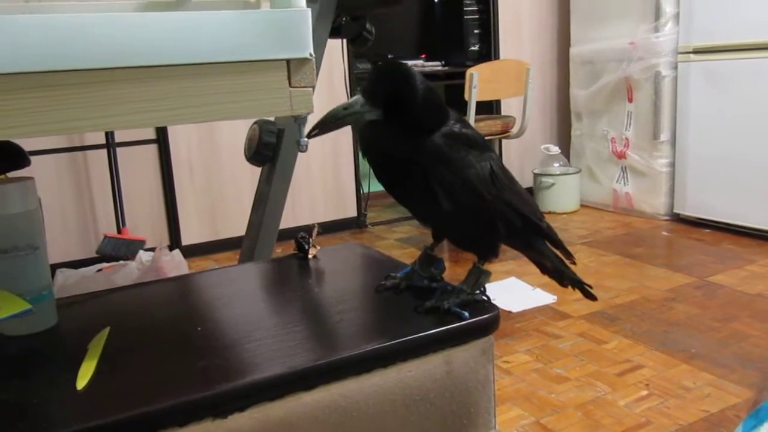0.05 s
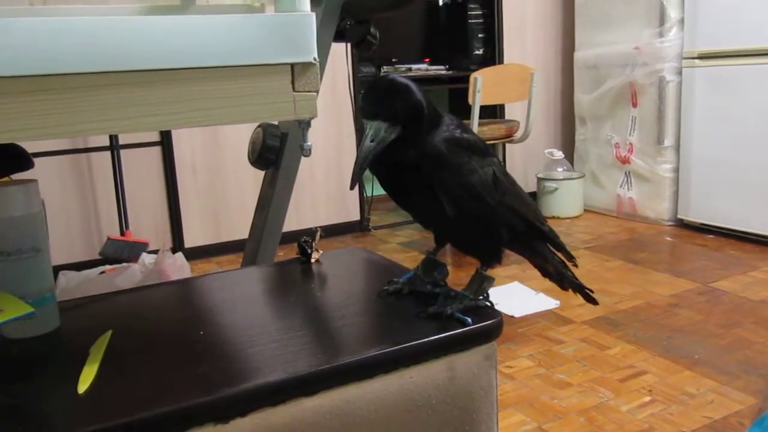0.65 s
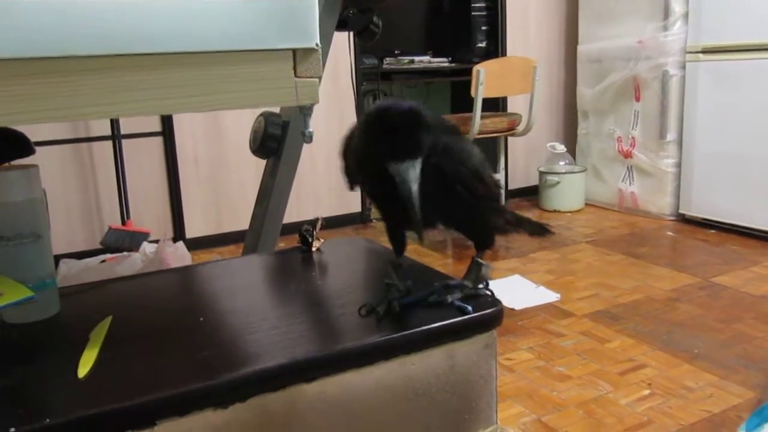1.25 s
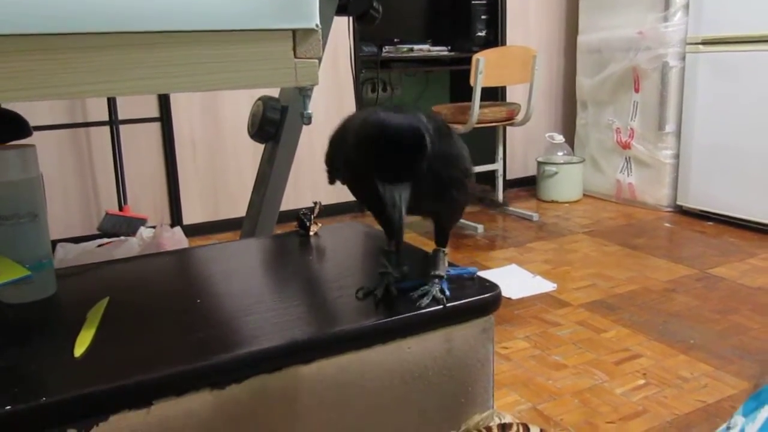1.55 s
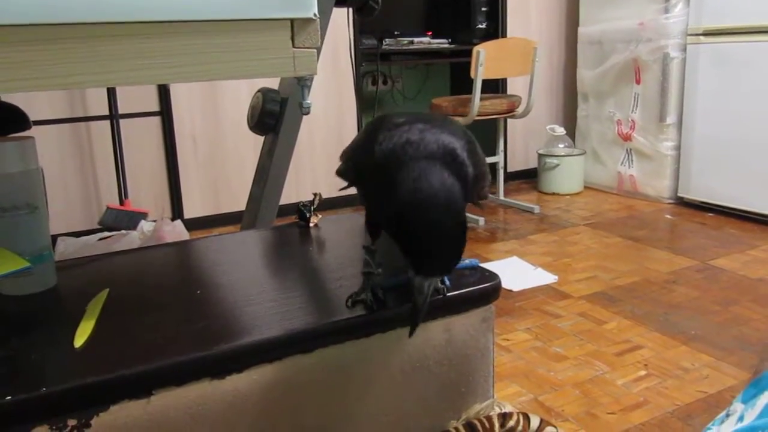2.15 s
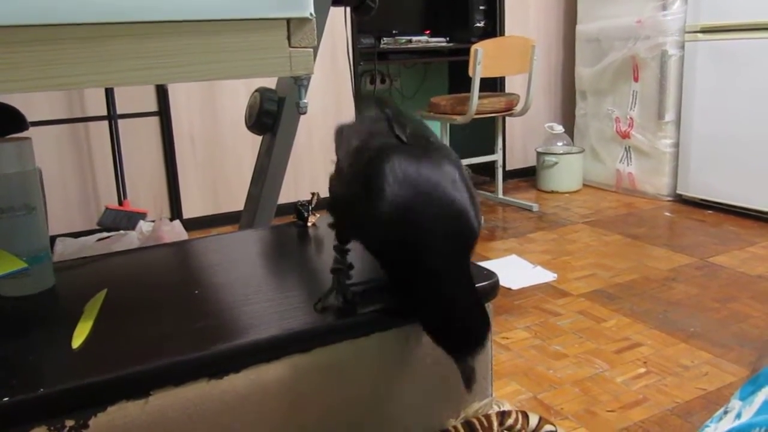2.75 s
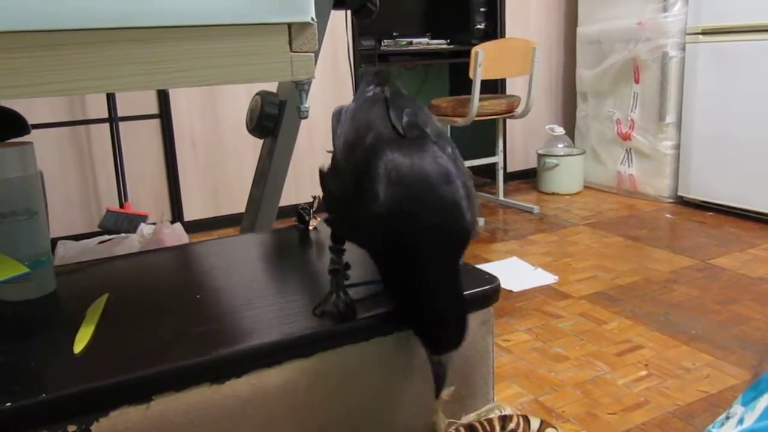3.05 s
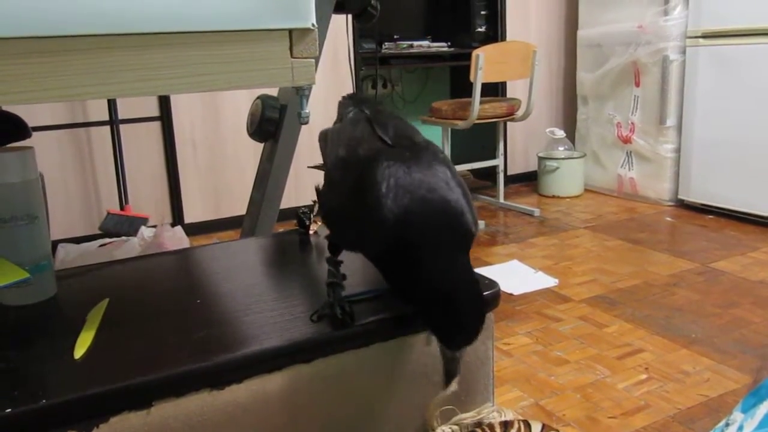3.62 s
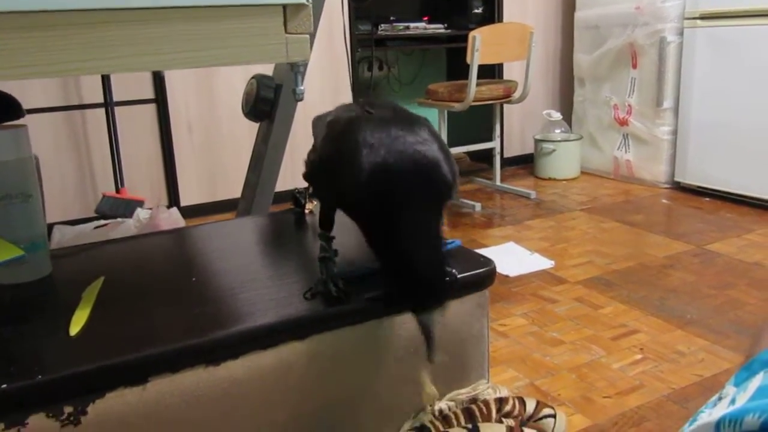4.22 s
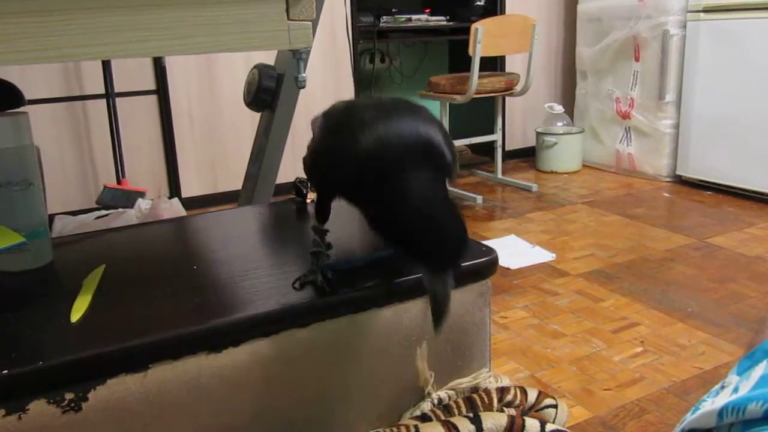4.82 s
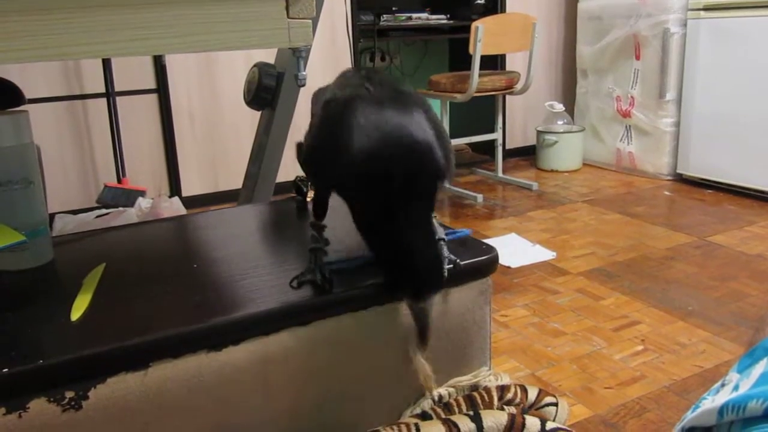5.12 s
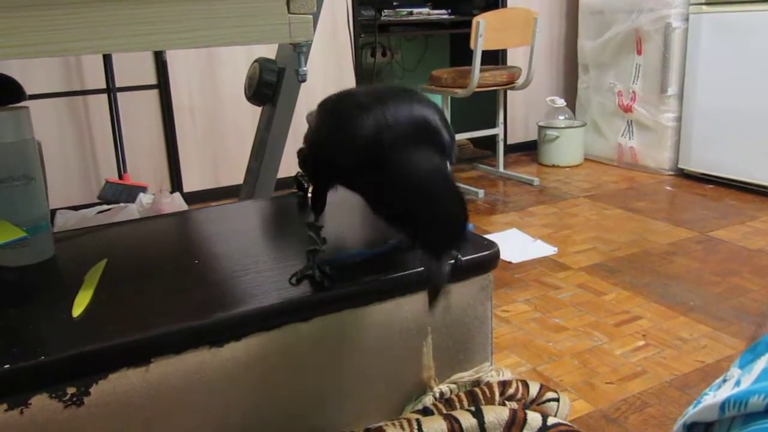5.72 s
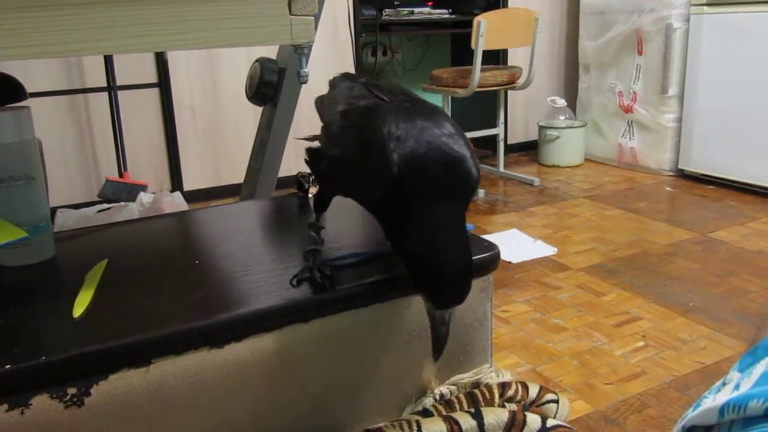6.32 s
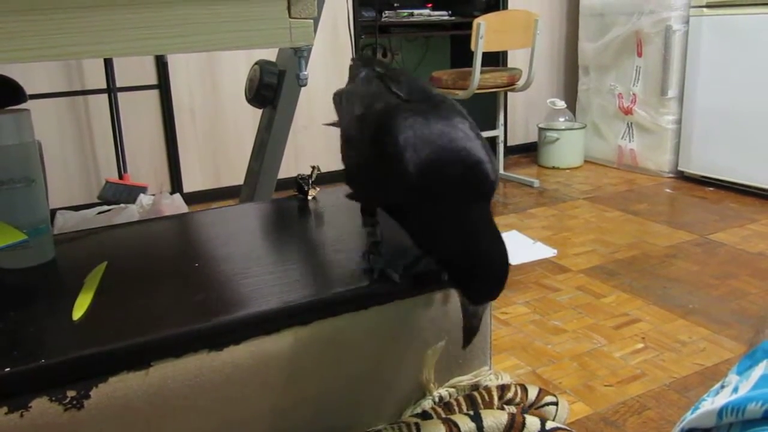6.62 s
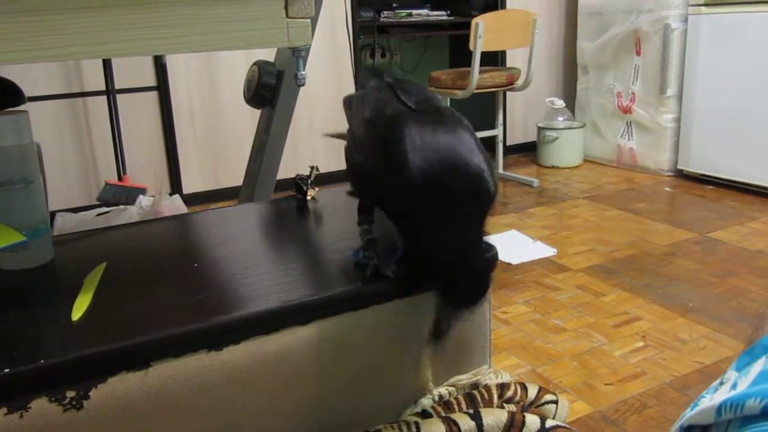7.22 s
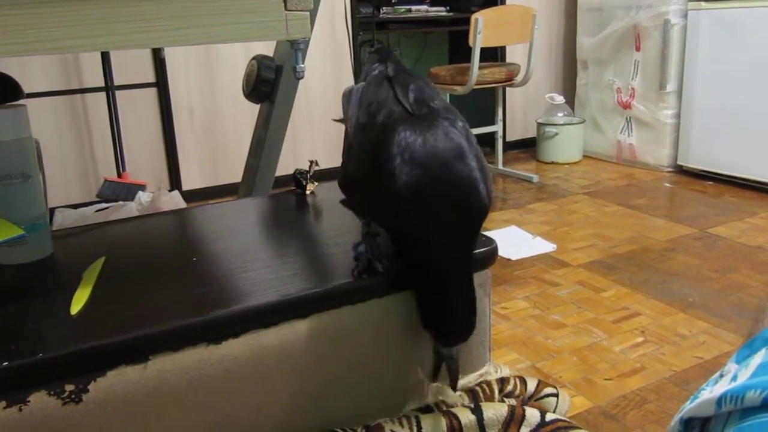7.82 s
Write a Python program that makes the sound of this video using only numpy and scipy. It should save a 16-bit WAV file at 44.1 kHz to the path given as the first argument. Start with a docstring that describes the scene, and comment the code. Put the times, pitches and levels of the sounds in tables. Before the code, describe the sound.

A single hollow beak snap opens, followed by a bird shifting about on a wooden table near the microphone. Short scratchy slides, bright claw ticks and soft knocks of its feet come in irregular clusters with pauses between, the sharpest clicks near the end. The small room reverberates slightly, and a faint rumble, electrical hum and high whine continue throughout.

```python
"""A low rumble, a mains hum and a thin electrical whine fill a small room throughout.
At 0.2 s a tame black bird, close by on a wooden table, snaps its beak, and the hollow bill rings.
From 0.9 s its claws skid on the hard top by stick-slip friction, then tick and catch on impact.
From 1.5 s its footfalls thud the board's modes, each followed by a faint tick of closing toes.
The walls answer every sound of the bird with brief reverberation."""
import sys
import numpy as np
from scipy import signal
from scipy.fft import rfft, irfft, next_fast_len
from scipy.io import wavfile
from scipy.ndimage import uniform_filter1d

SR = 44100
rng = np.random.default_rng(int(sys.argv[2]) if len(sys.argv) > 2 else 0)


def to_wav(sig):
    """Store sig (one row per channel, or 1-D mono) as 16-bit WAV at the path in sys.argv[1].

    Samples outside -1..1 are clipped; the rate is SR.
    """
    pcm = np.clip(np.atleast_2d(sig), -1, 1) * 32767
    pcm = np.round(pcm).astype(np.int16)
    wavfile.write(sys.argv[1], SR, pcm.T)  # frames by channels


N = 355878
HIT_SAMPLES = 8192

# footfalls: (time [s], level [dB], contact time [ms], boom relative to the board [dB])
FOOTFALLS = [(1.473, -44, 0.52, -6), (2.622, -38.5, 0.28, -11), (3.956, -41.5, 2, 3),
             (4.1675, -42, 0.62, -21), (4.1791, -34, 1, -19), (4.2645, -34.5, 1.6, -11),
             (4.4009, -29, 0.29, -16), (4.403, -25, 1.16, -24), (5.134, -33.5, 0.49, -15),
             (5.1427, -27, 0.97, -3), (6.4987, -31.5, 0.3, -22), (6.571, -37, .6, -19),
             (6.816, -35.5, 0.18, -3), (7.03, -36, 0.42, -22), (7.2559, -34, 1.5, -14)]


def undb(db):
    """Decibels to amplitude ratio."""
    return 10 ** (np.asarray(db) / 20)


def unit(x):
    """Normalise to unit energy."""
    return x / np.sqrt(np.sum(x ** 2) + 1e-18)


def blow(x, db):
    """Give a transient the energy of 2 ms of sound at this level."""
    return unit(x) * undb(db) * np.sqrt(SR * .002)


def add(out, s, x):
    """Superpose x on out from time s."""
    i = max(int(s * SR), 0)
    out[i:i + len(x)] += x[:max(len(out) - i, 0)]


def gains(points, size):
    """Gain per FFT bin of a spectrum of (frequency [Hz], level [dB]) points."""
    hz, db = np.transpose(points)
    return undb(np.interp(np.log(np.fft.rfftfreq(size, 1 / SR) + 1), np.log(hz), db))


def wander(count):
    """Slow modulation: a random course through count points."""
    return np.interp(np.arange(N), np.linspace(0, N, count), rng.standard_normal(count))


def background(air_db=-54.5, flutter_rad=.3):
    """Broadband noise gives rumble and hiss; hum and whine waver by phase and amplitude modulation."""
    # room noise spectrum: (frequency [Hz], relative level [dB])
    air_spectrum = [(12, -14), (20, -7), (53, -0.5), (74, -4.5), (222, -7.5), (367, -11.5), (410, -8.5),
                    (574, -12.5), (718, -13.5), (1060, -16.5), (1220, -17.5), (6360, -27.5), (7950, -23.5),
                    (8650, -24), (16000, -41.5)]
    # electrical tones: (frequency [Hz], level [dB])
    tones = [(49.3, -67.5), (1007, -78), (1258, -76.5), (7882, -67.5)]
    t = np.arange(N) / SR
    air = irfft(rfft(rng.standard_normal(N)) * gains(air_spectrum, N), N)
    out = unit(air) * np.sqrt(N) * undb(air_db)
    for hz, db in tones:
        phase = 2 * np.pi * hz * t + .5 * wander(count=20)
        phase += flutter_rad * hz / 7882 * wander(count=900)  # higher tones flutter more
        swell = 1 + .08 * wander(count=80)
        out += np.sqrt(2) * undb(db) * swell * np.sin(phase)
    return out


def contact(crunch_db, crunch_s, bounce_db, bounce_s):
    """Impact excitation: an impulse, a crunch of micro-impacts and a reflection off the table top."""
    t = np.arange(1024) / SR
    crunch = rng.standard_normal(len(t)) * np.exp(-t / crunch_s) * (1 - np.exp(-t / 0.00014))
    push = undb(crunch_db) * unit(crunch)
    push[0] += 1
    add(push, bounce_s * rng.uniform(0.61, 1.7), undb([bounce_db]))
    return push


def ring(modes, detune, scatter_db, in_step=0):
    """Damped modes sum, varying with the contact point; near the blow (in_step) they start in phase."""
    t = np.arange(HIT_SAMPLES) / SR
    out = np.zeros(HIT_SAMPLES)
    for hz, t60, db in modes:
        weight, tuning, polarity = rng.standard_normal(3)
        mode = np.cos(2 * np.pi * hz * (1 + detune * tuning) * t) * np.exp(-np.log(1000) * t / t60)
        out += undb(db + scatter_db * weight) * np.sign(polarity + in_step) * unit(mode)
    return unit(out)


def highpass(x, hz):
    """Radiation efficiency: a small body radiates poorly below its own modes."""
    return signal.sosfilt(signal.butter(2, hz, "high", fs=SR, output="sos"), x)


def beak(start_s=0.1883, first_db=-24, fall_db=6, gap_s=.0011, gap_ratio=.7):
    """Rebound: the mandibles chatter shut, each touch sooner and weaker, ringing the hollow bill."""
    # bill modes: (frequency [Hz], T60 [s], relative level [dB])
    bill_modes = [(1490, 0.0091, 5.5), (1760, 0.0069, 2), (1980, 0.0051, 2.5), (2780, 0.0088, -2.5),
                  (3660, 0.005, 4), (4170, .011, -6), (5800, 0.0027, -5), (6700, 0.0059, -3),
                  (7050, .007, -1), (8170, 0.022, 2), (9130, 0.0044, -0.5), (9900, .007, -7),
                  (10800, 0.002, 3.5)]
    out, s = np.zeros(N), start_s
    for k in range(4):
        push = contact(crunch_db=-3, crunch_s=0.0011, bounce_db=-14, bounce_s=.0004)
        bill = ring(bill_modes, detune=.006, scatter_db=2.5)
        add(out, s, blow(signal.fftconvolve(push, bill), first_db - k * fall_db))
        s += gap_s * gap_ratio ** k
    return signal.sosfilt(signal.butter(4, 11800, fs=SR, output="sos"), highpass(out, hz=1180))


def room(x, wet_db, t60_low=0.28, t60_high=0.36, build_s=0.0016, patchy=0.78):
    """Diffuse reverberation: scattered wall echoes build up quickly and decay exponentially."""
    # colour of the echoes: (frequency [Hz], relative level [dB])
    wall_spectrum = [(100, 2.5), (400, -5.5), (1200, 1.5), (2000, -1), (3500, 1), (5000, 6.5), (7500, 5),
                     (10000, 0), (15000, -4)]
    size = 32768
    t = np.arange(size) / SR
    echoes = rng.standard_normal(size) * np.exp(patchy * rng.standard_normal(size) * np.exp(-t / 0.088))
    low = signal.sosfilt(signal.butter(2, 3000, fs=SR, output="sos"), echoes)
    decay = -np.log(1000) * t
    spectrum = rfft(low * np.exp(decay / t60_low) + (echoes - low) * np.exp(decay / t60_high))
    # a cluttered room favours no single pitch
    spectrum /= np.sqrt(uniform_filter1d(np.abs(spectrum) ** 2, size=41))
    tail = irfft(spectrum * gains(wall_spectrum, size))[:size // 2]
    tail = unit(tail * (1 - np.exp(-(t[:size // 2] / build_s) ** 2)))
    # sound leaves in all directions with unrelated phases, which blurs its pitches in the echoes
    analytic = signal.hilbert(x, next_fast_len(N))[:N]
    sent = np.real(analytic * np.exp(1j * wander(count=5000)))
    return x + undb(wet_db) * signal.fftconvolve(sent, tail)[:N]


def minimum_phase(gain):
    """Folding the cepstrum gives a causal impulse response with these gains."""
    cepstrum = irfft(np.log(gain))
    half = len(cepstrum) // 2
    cepstrum[1:half] *= 2
    cepstrum[half + 1:] = 0
    return unit(irfft(np.exp(rfft(cepstrum))))


def tip(bright_hz):
    """Impulse response of a claw tip; a higher bright_hz tilts its treble upwards."""
    # tick of the tip: (frequency [Hz], relative level [dB])
    tip_spectrum = [(200, -34), (1000, -18.5), (2500, -16), (4000, -6.5), (5300, -8.5), (7000, -6.5),
                    (9000, 0), (11000, -3.5), (13000, -13.5), (16000, -28)]
    hz = np.fft.rfftfreq(512, 1 / SR)
    tilt = (np.clip(hz, 6300, 12000) / 9000) ** (7 * np.log2(bright_hz / 8900))
    return minimum_phase(gains(tip_spectrum, size=512) * tilt)


def claw(toe_hz, db_per_octave=16):
    """Resonance of a claw: each toe favours the modes near its own pitch."""
    # modes of a claw on the hard top: (frequency [Hz], T60 [s], relative level [dB])
    claw_modes = [(1420, 0.011, -16), (2069, 0.04, 2), (2490, 0.006, -6.5), (3024, 0.013, -1.5),
                  (3295, 0.012, -3.5), (3763, 0.018, -1.5), (4050, 0.0042, -10), (4820, 0.01, -10.5),
                  (5350, 0.0093, -9)]
    modes = [(hz, t60, db - db_per_octave * abs(np.log2(hz / toe_hz))) for hz, t60, db in claw_modes]
    return highpass(ring(modes, detune=0.015, scatter_db=2.5), hz=700)


def skids(slips_per_s=4000, uneven_db=4, swell=.25):
    """Stick-slip friction: dense, uneven ticks; short jabs start harder and ring more than long slides."""
    # claw slides: (time [s], duration [s], hiss level [dB], toe pitch [Hz])
    slides = [(0.925, 0.062, -47, 2700), (1.148, 0.018, -36.5, 2180), (1.293, 0.068, -53, 2870),
              (1.459, 0.018, -45, 2450), (2.019, 0.022, -47.5, 3100), (2.549, 0.14, -55, 2700),
              (3.28, 0.039, -63, 3300), (4.24, 0.046, -61, 3000), (4.398, 0.0084, -46.5, 3970),
              (6.475, 0.027, -46, 3380), (6.568, 0.0052, -35, 3200), (6.8014, 0.009, -43.5, 3200),
              (7.026, 0.0036, -36, 3420), (7.17, 0.08, -62, 3300)]
    out = np.zeros(N)
    for s, duration, db, toe_hz in slides:
        count = max(int(duration * SR), 16)
        chance, size, sign = rng.random((3, HIT_SAMPLES))[:, :count]
        strength = undb(-uneven_db * np.log(np.maximum(size, .06)))
        doublings = np.log2(duration / .02)
        envelope = np.sin(np.pi * (np.arange(count) + .5) / count) ** (swell * 2 ** (doublings / 2))
        slips = (chance < slips_per_s / SR) * strength * np.sign(sign - .5) * envelope
        ring_db = db - 2.5 - 0.3 * doublings
        add(out, s, unit(np.convolve(slips, tip(bright_hz=8800))) * np.sqrt(count) * undb(db))
        add(out, s, unit(signal.fftconvolve(slips, claw(toe_hz))) * np.sqrt(count) * undb(ring_db))
    return out


def ticks(graze_db=-14, ring_growth=0.71):
    """Hard impact: a claw grazes the top, then catches with a bright tick and a short ring."""
    # claw catches: (time [s], level [dB], brightness [Hz], toe pitch [Hz])
    catches = [(1.1491, -32.5, 7650, 3000), (1.168, -27, 8200, 3200), (1.2382, -39.5, 8800, 3300),
               (1.3422, -41, 9300, 3000), (1.4379, -31.5, 8950, 2900), (1.467, -33.5, 10300, 2800),
               (1.4716, -36, 9100, 2670), (1.8704, -48.5, 9000, 3700), (2.0008, -41.5, 8300, 3300),
               (2.0056, -40.5, 8300, 3500), (2.024, -41, 9500, 3100), (2.5372, -43, 8700, 3800),
               (2.5773, -39, 9500, 3500), (2.6111, -42, 8200, 3200), (2.6207, -34, 8800, 2150),
               (3.116, -41, 8300, 4030), (3.8913, -50.5, 8440, 3600), (4.064, -33.5, 7400, 4270),
               (4.1787, -40, 8850, 2850), (4.264, -48.5, 9450, 3200), (4.402, -29, 7440, 1500),
               (4.934, -52.5, 10000, 2700), (5.1096, -31.5, 8560, 3600), (5.134, -34.5, 6600, 4500),
               (5.1428, -36.5, 9900, 1600), (6.475, -38.5, 7950, 3900), (6.498, -28.5, 8600, 3100),
               (6.5752, -23, 9700, 3200), (6.604, -44, 9100, 4000), (6.8142, -27, 9900, 3400),
               (7.0364, -21.5, 9700, 3700), (7.256, -48, 8850, 2400), (7.8226, -50, 8600, 3500)]
    out = np.zeros(N)
    t = np.arange(256) / SR
    for s, tip_db, bright_hz, toe_hz in catches + grips():
        crunch_db = np.interp(tip_db, [-36, -24], [-1, -10])  # the hardest catches are the cleanest
        push = contact(crunch_db, crunch_s=0.0014, bounce_db=-9.5, bounce_s=.0008)
        graze = rng.standard_normal(len(t)) * np.exp(-t[::-1] / 0.0012)
        ring_db = -43 + ring_growth * (tip_db + 35)  # the ring grows more slowly than the tick
        add(out, s - len(t) / SR, blow(np.convolve(graze, tip(9100)), min(tip_db, -34) + graze_db))
        add(out, s, blow(np.convolve(push, tip(bright_hz)), tip_db))
        add(out, s, blow(signal.fftconvolve(push, claw(toe_hz)), ring_db))
    return out


def pad(contact_ms):
    """Force pulse of a soft foot pad: a longer contact has a narrower, duller spectrum."""
    u = 2 * np.pi * np.arange(512) / SR * 1000 / contact_ms
    return u * np.exp(-u)


def steps(settle_s=.03, settle_db=-12, settle_ms=1.44):
    """Plate vibration: a foot pad drives the board, then the weight settles with a weaker push."""
    # table top modes: (frequency [Hz], T60 [s], relative level [dB])
    board_modes = [(232, 0.06, -6), (272, 0.099, 5), (320, 0.084, 5.5), (400, 0.028, -1), (546, 0.012, 3.5),
                   (652, 0.038, -2), (965, 0.02, -36), (1250, 0.009, 1), (1525, 0.011, 2),
                   (2280, 0.015, -3.5), (3900, 0.015, -20)]
    # low modes of the whole table: (frequency [Hz], T60 [s], relative level [dB])
    frame_modes = [(71.4, 0.1, 2), (124.2, 0.28, 4.5), (150, 0.064, 7.5)]
    out = np.zeros(N)
    for s, db, contact_ms, boom_db in FOOTFALLS:
        board = ring(board_modes, detune=.015, scatter_db=1, in_step=3)
        frame = ring(frame_modes, detune=0.039, scatter_db=3.0)
        body = unit(highpass(board, hz=141)) + undb(boom_db) * unit(highpass(frame, hz=60.4))
        add(out, s, blow(signal.fftconvolve(pad(contact_ms), body), db))
        settle = blow(signal.fftconvolve(pad(settle_ms), body), db + settle_db)
        add(out, s + settle_s * rng.uniform(.7, 1.3), settle)
    return out


def grips(within_s=.06, relative_db=-20.5, uneven_db=3, bright_hz=9000, toe_hz=3100):
    """Secondary impacts: one faint claw catch per footfall as the toes close."""
    chance = rng.random((len(FOOTFALLS), 2))
    return [(s + within_s * (1 + 2 * lag) / 3,
             db + relative_db + uneven_db * (2 * force - 1), bright_hz, toe_hz)
            for (s, db, *_), (lag, force) in zip(FOOTFALLS, chance)]


def scene():
    """Superposition of bird and background; each of the bird's sounds has its own echo paths."""
    bird = room(beak(), wet_db=-8.0) + room(ticks(), wet_db=-9.5)
    bird += room(skids(), wet_db=-5.5) + room(steps(), wet_db=-4.5)
    return (bird + background())[None]


def record(dry, cutoff_hz=16200):
    """Band limiting: a steep low-pass filter removes the highest treble."""
    return signal.sosfilt(signal.ellip(8, .2, 70, cutoff_hz, fs=SR, output="sos"), dry)


dry = scene()
out = record(dry)
to_wav(out)
```